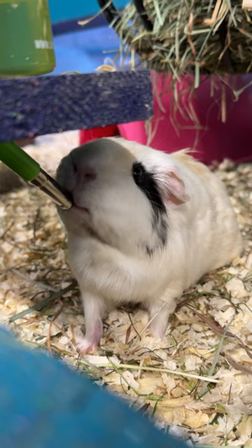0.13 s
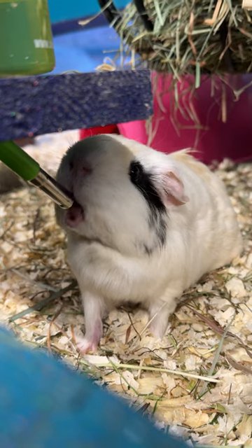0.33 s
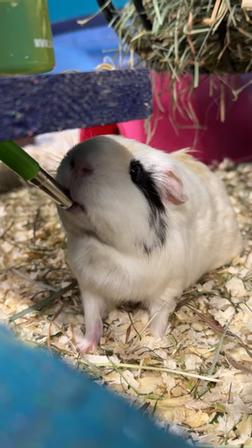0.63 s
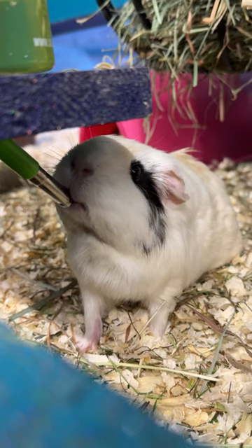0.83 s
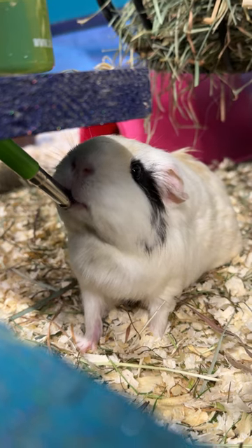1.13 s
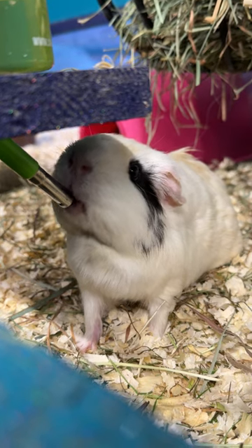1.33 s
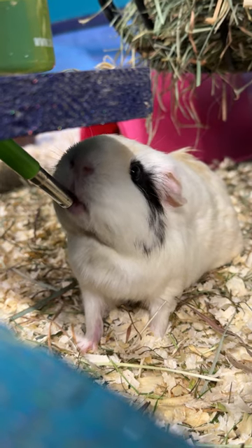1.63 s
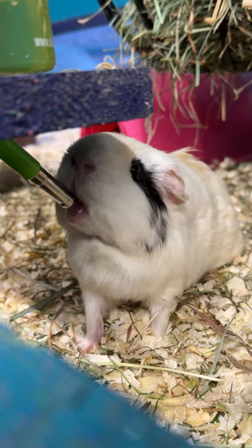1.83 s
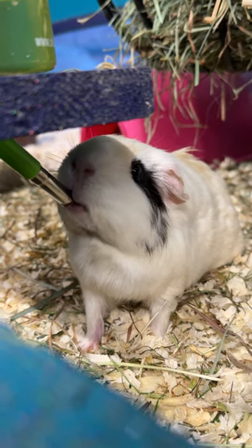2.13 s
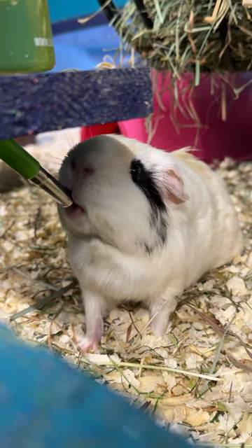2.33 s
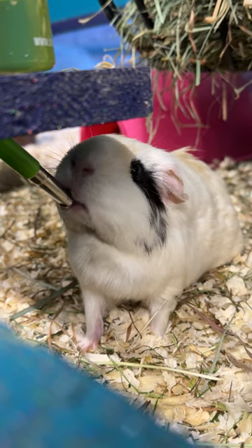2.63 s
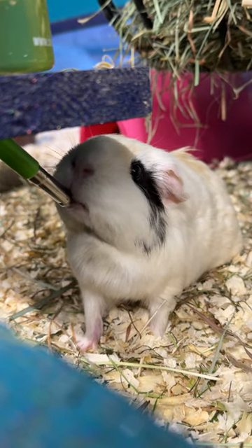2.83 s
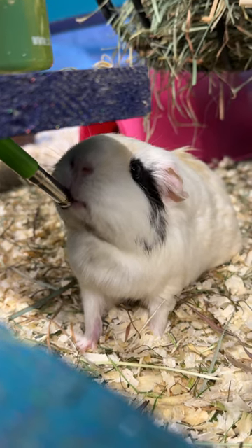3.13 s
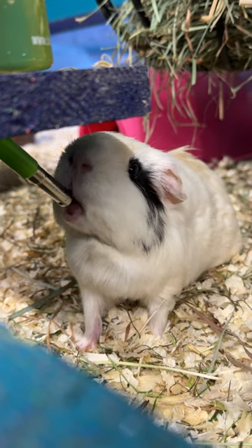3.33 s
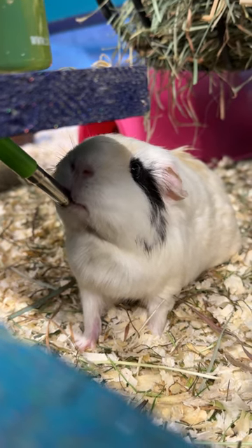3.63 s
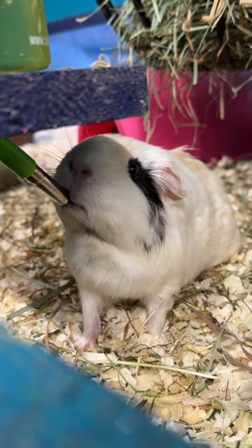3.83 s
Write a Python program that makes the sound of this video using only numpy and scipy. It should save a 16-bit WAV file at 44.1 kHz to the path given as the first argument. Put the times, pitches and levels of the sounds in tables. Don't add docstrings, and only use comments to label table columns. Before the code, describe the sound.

Bright irregular knocks of a steel ball in a drinking tube, with soft wet laps between

```python
import sys
import numpy as np
from scipy import signal
from scipy.fft import rfft, irfft
from scipy.io import wavfile

SR = 44100
rng = np.random.default_rng(int(sys.argv[2]) if len(sys.argv) > 2 else 0)


def to_wav(sig):
    pcm = np.clip(np.atleast_2d(sig), -1, 1) * 32767
    pcm = np.round(pcm).astype(np.int16)
    wavfile.write(sys.argv[1], SR, pcm.T)


def gain_from_db(level_db):
    decades = np.asarray(level_db, float) / 20
    return 10 ** decades


N = 176400
T = np.arange(N) / SR
HZ = np.fft.rfftfreq(N, 1 / SR)

# frequency in Hz, level in dB.
ROOM_COLOUR = [(45, -19), (115, -4), (200, 0), (400, -4), (600, -16), (1500, -24), (5000, -39), (8500, -39),
               (12500, -34)]
# frequency in Hz, level in dB.
ROOM_SIDE_COLOUR = [(100, -28), (800, -6), (1300, -8), (2400, -14)]
# centre in Hz, width in Hz, level in dB.
ROOM_HUMS = [(193, 25, -57), (301, 6, -59), (343, 9, -59)]
# time in seconds, level in dB.
HAND_RUMBLE = [
    (.05, -58),
    (.6, -56),
    (1.1, -57),
    (2.3, -59),
    (3.1, -55),
    (3.6, -56),
]
# centre in seconds, pitch in Hz, length in seconds, level in dB.
FINGER_BUMPS = [(.56, 110, .06, -49), (.68, 48, .13, -39), (.69, 110, .08, -45), (.82, 95, .06, -48),
                (.86, 50, .07, -49), (.91, 100, .05, -49), (1.0, 52, .11, -45), (1.26, 120, .07, -49),
                (1.42, 100, .08, -51), (1.65, 58, .09, -49), (2.01, 70, .08, -52), (2.76, 47, .1, -49),
                (2.92, 60, .06, -50)]
# time in seconds, level in dB.
PHONE_JOLT = [
    (3.68, -55),
    (3.72, -36),
    (3.77, -24),
    (3.82, -30),
    (3.85, -38),
    (3.88, -28),
    (3.92, -40),
    (3.96, -36),
    (4, -40),
]
# time in seconds, level in dB.
SIDE_DRIPS = [
    (.197, -48),
    (.297, -51),
    (1.232, -49),
    (1.265, -52),
]
# start in seconds, fall in seconds, mouth level in dB, lips level in dB.
TONGUE_LAPS = [(.21, .02, -62, -62), (1.19, .05, -58, -56), (1.31, .04, -56, -58), (1.51, .04, -60, -60),
               (2.062, .02, -50, -49), (2.089, .04, -52, -47), (2.19, .045, -56, -56),
               (2.275, .025, -60, -57), (2.335, .04, -57, -57), (2.6, .06, -55, -53),
               (3.012, .03, -53, -48), (3.224, .04, -54, -49), (3.345, .035, -59, -59),
               (3.565, .05, -59, -59), (3.679, .045, -47, -53), (3.706, .015, -45, -60),
               (3.731, .022, -39, -42), (3.812, .035, -53, -50), (3.945, .05, -59, -59)]
# frequency in Hz, level in dB.
MOUTH_COLOUR = [(600, -13), (1130, 0), (1450, -7), (1870, 0), (2400, -5), (2900, -14), (5000, -26)]
# frequency in Hz, level in dB.
LIPS_COLOUR = [(2800, -17), (3500, 0), (3800, -5), (4250, -1), (4800, -12), (5500, -7), (7000, -12),
               (10000, -11), (15000, -15)]
# time in seconds, bottle dB, tube dB, ball dB.
SPOUT_KNOCKS = [(0.4002, -41, -28, -21), (0.4127, -34, -41, -29), (0.4368, -31, -38, -33),
                (0.4584, -45, -37, -36), (0.4711, -46, -32, -33), (0.5337, -29, -30, -31),
                (0.5912, -39, -33, -38), (0.6133, -40, -34, -37), (0.788, -36, -28, -23),
                (0.8035, -37, -41, -37), (0.8167, -34, -40, -38), (0.8573, -46, -44, -30),
                (0.9022, -36, -44, -36), (0.9882, -43, -36, -41), (1.0613, -35, -28, -25),
                (1.0816, -38, -29, -27), (1.1075, -35, -34, -40), (1.1266, -37, -28, -33),
                (1.2989, -43, -43, -48), (1.3561, -32, -23, -16), (1.3724, -39, -29, -25),
                (1.3793, -34, -42, -34), (1.4199, -37, -42, -32), (1.4408, -40, -32, -34),
                 (1.5487, -48, -47, -50), (1.647, -30, -24, -21), (1.6643, -39, -31, -20),
                 (1.6713, -44, -43, -25), (1.6963, -33, -39, -44), (1.7302, -35, -28, -29),
                 (1.7918, -40, -34, -39), (1.885, -31, -30, -16), (1.901, -30, -36, -17),
                 (1.9385, -39, -36, -40), (1.9673, -37, -25, -29), (2.0636, -46, -45, -38),
                 (2.4507, -36, -29, -19), (2.4867, -31, -37, -33), (2.5103, -43, -40, -40),
                 (2.5188, -46, -35, -34), (2.5897, -38, -40, -32), (2.8112, -35, -31, -19),
                (2.8315, -30, -38, -27), (2.8705, -36, -34, -37), (2.8817, -44, -37, -25),
               (2.9105, -52, -41, -52), (2.9761, -37, -35, -36), (3.0548, -31, -25, -20),
               (3.072, -32, -35, -27), (3.1089, -39, -43, -31), (3.1179, -40, -31, -31),
               (3.1294, -36, -30, -31), (3.1547, -48, -41, -49), (3.1963, -51, -53, -36),
               (3.3132, -43, -43, -42), (3.3901, -35, -28, -21), (3.407, -36, -31, -23),
               (3.4557, -37, -31, -27), (3.4686, -35, -32, -30), (3.4905, -46, -43, -39),
               (3.6803, -50, -50, -41), (3.7078, -39, -52, -50), (3.7324, -46, -46, -39)]
# time in seconds, level in dB.
BALL_TICKS = [(0.3954, -30), (0.3982, -30), (0.4032, -25), (0.4105, -24), (0.44, -33), (0.466, -28),
              (0.4808, -27), (0.484, -32), (0.5388, -27), (0.5432, -25), (0.55, -29), (0.5551, -33),
              (0.7837, -28), (0.796, -30), (0.866, -31), (0.912, -28), (1.0568, -27), (1.0722, -29),
              (1.0789, -22), (1.1175, -26), (1.3522, -28), (1.3812, -24), (1.4258, -29), (1.431, -28),
              (1.4462, -26), (1.6434, -31), (1.7255, -33), (1.7403, -32), (1.7445, -35), (1.8813, -27),
              (1.8913, -22), (1.9055, -18), (1.9767, -35), (2.0654, -28), (2.0709, -31), (2.4461, -28),
              (2.4623, -31), (2.5242, -31), (2.5305, -27), (2.5995, -29), (2.8061, -28), (2.8202, -29),
              (2.864, -29), (2.8877, -28), (2.9888, -35), (2.9951, -34), (3.0507, -29), (3.0633, -26),
              (3.0751, -28), (3.0775, -27), (3.0895, -28), (3.1273, -28), (3.1334, -25), (3.3863, -30),
              (3.3932, -20), (3.4119, -25), (3.496, -36), (3.7345, -28)]
# frequency in Hz, level in dB, T60 in seconds.
BOTTLE_MODES = [(200, -6, .03), (520, -5, .012), (721, 0, .02), (926, -4, .025), (1200, 0, .02),
                (1430, 0, .03), (1650, -2, .012)]
TUBE_MODES = [(2050, -4, .008), (2350, -1, .018), (2950, -2, .009), (3110, -6, .09), (3450, -3, .007),
              (4090, -2, .011), (5100, -6, .004)]
BALL_MODES = [(5900, -13, .003), (6900, -10, .003), (7800, -7, .003), (9000, -4, .003), (10500, 0.1, .003),
              (12300, 1.5, .006), (13800, -6, .003), (15400, -14, .004)]
# rise in seconds, fall in seconds, tail dB, tail fall in seconds,
# after-sound dB, gain dB, lead-in dB, clean strike dB.
BOTTLE_CONTACT = (.001, .003, -13, .012, -28, -5, -28, -11)
TUBE_CONTACT = (.0002, .0013, -15, .01, -32, -6.5, -30, -6)
BALL_CONTACT = (.0001, .0006, -24, .008, -42, -2, -41, -6)
# frequency in Hz, left lead in radians.
PORT_PHASE = [(0, 0), (800, .3), (1500, .2), (5000, .1), (6890, -1.2), (10500, -2.8), (13000, -3.4),
              (15600, -4.6)]

ROOM_DB, ROOM_SWAY_DB = -50, 1.2
RUMBLE_HZ, JOLT_HZ = 65, 80
DRIP_HZ, DRIP_T60_S = 800, .012
LAP_RISE_S = .003
CHATTER_DB, SPOT_DB = 3, 1.3
LEAD_S, AFTER_S = .008, .05
TICK_BALL_DB, TICK_TUBE_DB = -8, -20
BOTTLE_SIDE_DB = -12
COMMON_DB = -15
START_S, LOW_CUT_HZ, TOP_HZ = .036, 35, 15800


def unit(x):
    return x / np.sqrt(np.mean(x ** 2))


def colour(table):
    hz, db = np.array(table).T
    return gain_from_db(np.interp(np.log(HZ + 1), np.log(hz), db))


def noise(gain):
    return unit(irfft(rfft(rng.standard_normal(N)) * gain, N))


def walk(rate_hz):
    knots = rng.standard_normal(2000)
    return 1.2 * np.interp(T * rate_hz, np.arange(len(knots)), knots)


def fade(x, tau_s):
    return signal.lfilter([1], [1, -np.exp(-1 / (max(tau_s, 1e-5) * SR))], x)


def ring(x, modes, spot_db=0):
    out = 0
    for k, (hz, db, t60_s) in enumerate(modes):
        pole = np.exp(2j * np.pi * hz / SR - np.log(1000) / (t60_s * SR))
        drive = x * gain_from_db(db + spot_db * walk(25))
        mode = signal.lfilter([1], [1, -pole], drive).imag
        out = out + (-1) ** k * np.sqrt(1 - abs(pole) ** 2) * mode
    return out


def room():
    mid = gain_from_db(ROOM_DB + ROOM_SWAY_DB * walk(6)) * noise(colour(ROOM_COLOUR))
    for hz, width_hz, db in ROOM_HUMS:
        mid = mid + gain_from_db(db) * noise(1 / (1 + ((HZ - hz) / width_hz * 2) ** 2))
    side = gain_from_db(ROOM_DB - 13) * noise(colour(ROOM_COLOUR) * colour(ROOM_SIDE_COLOUR))
    return mid, side


def band(hz, width_hz):
    return noise(1 / (1 + ((HZ - hz) / width_hz) ** 4))


def hand():
    time_s, db = np.array(HAND_RUMBLE).T
    rumble = gain_from_db(np.interp(T, time_s, db)) * band(RUMBLE_HZ, 35)
    for centre_s, hz, length_s, db in FINGER_BUMPS:
        swell = np.exp(-(2.2 * (T - centre_s) / length_s) ** 2)
        rumble = rumble + gain_from_db(db + 3) * swell * np.sin(2 * np.pi * hz * (T - centre_s) + walk(12))
    phase = 2 * np.pi * np.cumsum(JOLT_HZ * (1 + .07 * walk(15))) / SR
    wobble = 1.3 * np.sin(phase) + .3 * band(60, 15) + .2 * band(120, 20) + .22 * band(170, 50)
    time_s, db = np.array(PHONE_JOLT).T
    return rumble + gain_from_db(np.interp(T, time_s, db, left=-99)) * wobble


def drips():
    hit = np.zeros(N)
    for time_s, db in SIDE_DRIPS:
        hit[int(time_s * SR)] = gain_from_db(db + 24)
    return ring(hit, [(DRIP_HZ, 0, DRIP_T60_S), (DRIP_HZ * 1.4, -4, DRIP_T60_S)])


def tongue():
    swells = []
    for start_s, fall_s, _, _ in TONGUE_LAPS:
        rise = np.clip((T - start_s) / LAP_RISE_S, 0, 1)
        swells.append(rise * np.exp(-np.maximum(T - start_s, 0) / fall_s))
    mouth, lips = gain_from_db(np.array(TONGUE_LAPS)[:, 2:].T) @ swells
    rubbing = mouth * noise(colour(MOUTH_COLOUR)) + lips * noise(colour(LIPS_COLOUR))
    return gain_from_db(1.5 * walk(300)) * rubbing


def struck_part(times_s, levels_db, modes, contact):
    rise_s, fall_s, tail_db, tail_s, after_db, gain_db, lead_db, clean_db = contact
    strike = np.zeros(N)
    strike[(times_s * SR).astype(int)] = gain_from_db(levels_db + gain_db)
    hit = fade(strike, rise_s) / max(rise_s * SR, 1)
    lead_in = gain_from_db(lead_db) * fade(strike[::-1], LEAD_S)[::-1]
    tail = gain_from_db(tail_db) * fade(hit, tail_s)
    after = gain_from_db(after_db) * fade(hit, AFTER_S)
    envelope = fade(hit, fall_s) + gain_from_db(CHATTER_DB * walk(400)) * (lead_in + tail + after)
    rough = envelope * np.sign(rng.standard_normal(N))
    clean = gain_from_db(clean_db) * np.sqrt(fall_s * SR) * strike
    return ring(rough + clean, modes, SPOT_DB)


def spout():
    knock_s, bottle_db, tube_db, ball_db = np.array(SPOUT_KNOCKS).T
    tick_s, tick_db = np.array(BALL_TICKS).T
    times_s = np.r_[knock_s, tick_s]
    tube = struck_part(times_s, np.r_[tube_db, tick_db + TICK_TUBE_DB], TUBE_MODES, TUBE_CONTACT)
    ball = struck_part(times_s, np.r_[ball_db, tick_db + TICK_BALL_DB], BALL_MODES, BALL_CONTACT)
    bottle = struck_part(knock_s, bottle_db, BOTTLE_MODES, BOTTLE_CONTACT)
    cage = struck_part(knock_s, bottle_db + BOTTLE_SIDE_DB, BOTTLE_MODES[1:4], BOTTLE_CONTACT)
    return bottle + tube + ball, cage


def scene():
    mid, side = room()
    front, cage = spout()
    hz, lead_rad = np.array(PORT_PHASE).T
    split = np.exp(.5j * np.interp(HZ, hz, lead_rad))
    spectrum = rfft(mid + hand() + tongue() + front)
    side = side + drips() + cage
    left = irfft(spectrum * split, N) + side
    right = irfft(spectrum / split, N) - side
    return np.array([left, right]) + gain_from_db(COMMON_DB) * front


def low_pass(x):
    return signal.sosfilt(signal.butter(12, 17150, fs=SR, output="sos"), x)


def record(dry):
    low_cut = signal.lfilter(*signal.butter(2, LOW_CUT_HZ, "high", fs=SR), dry)
    top_cut = signal.ellip(8, .2, 40, TOP_HZ, fs=SR, output="sos")
    x = signal.sosfilt(top_cut, low_cut)
    return low_pass(x * np.clip((T - START_S) / .001, 0, 1))


dry = scene()
out = record(dry)
to_wav(out)
```